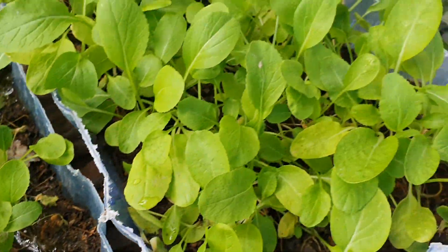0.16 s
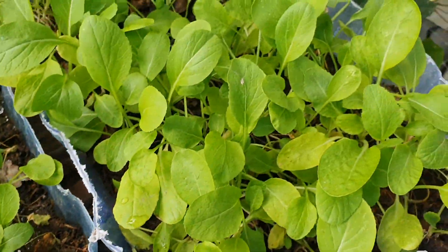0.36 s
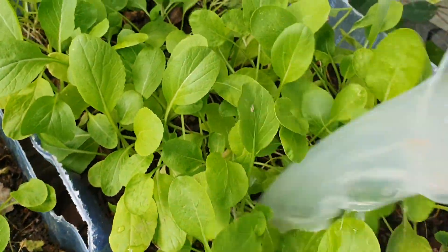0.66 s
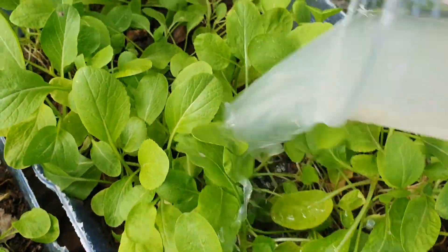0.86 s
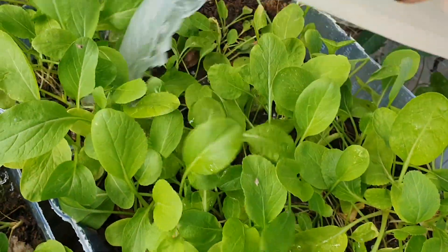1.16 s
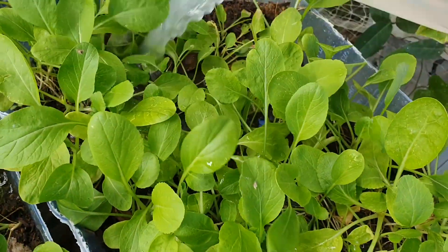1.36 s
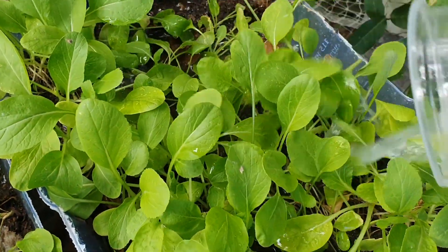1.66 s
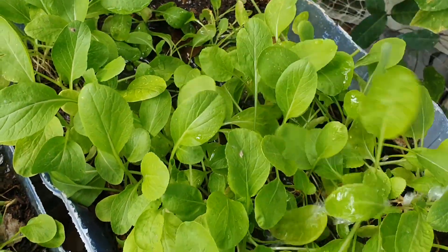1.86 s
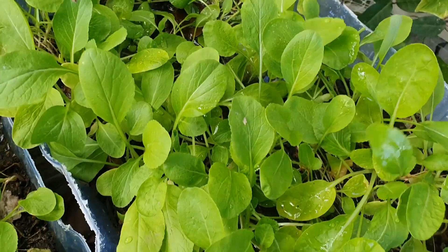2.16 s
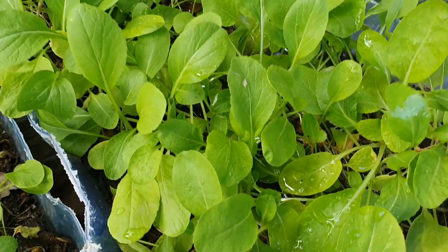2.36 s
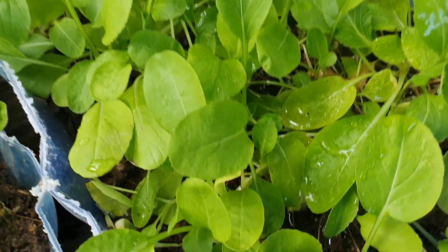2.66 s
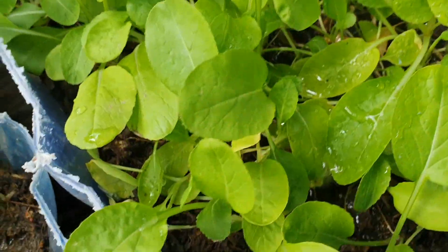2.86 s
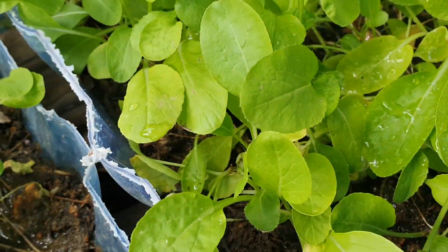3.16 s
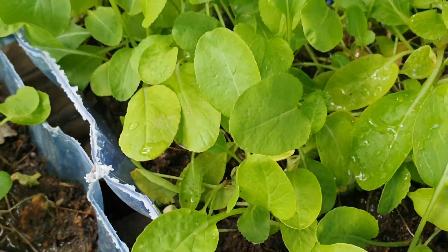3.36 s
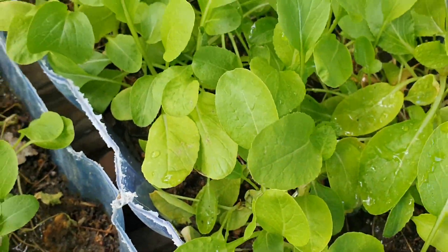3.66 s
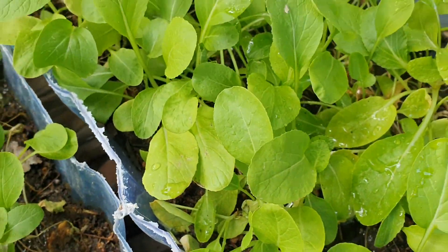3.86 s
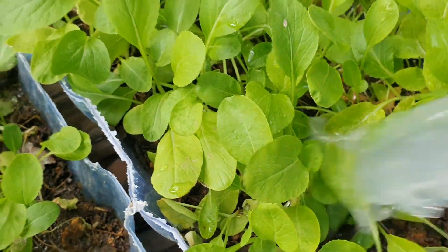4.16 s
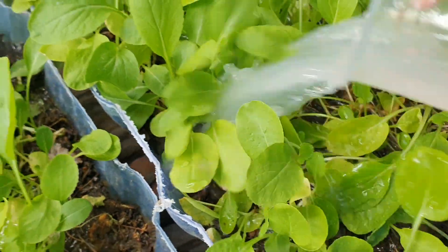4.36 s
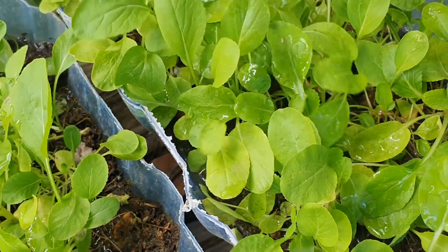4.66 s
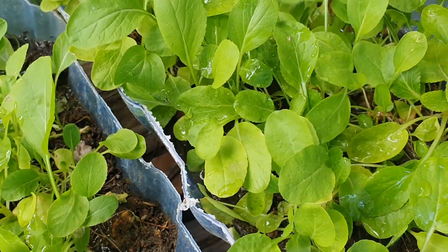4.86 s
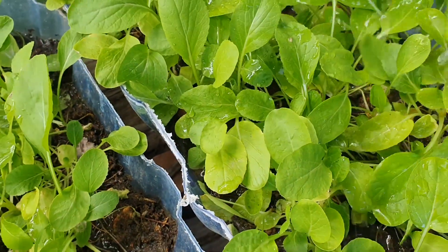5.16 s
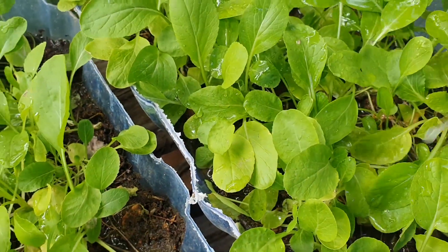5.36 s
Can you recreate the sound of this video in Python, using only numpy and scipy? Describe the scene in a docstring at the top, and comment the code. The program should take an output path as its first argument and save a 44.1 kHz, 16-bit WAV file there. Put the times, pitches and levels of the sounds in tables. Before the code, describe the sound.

A low street rumble with droning engines opens the scene. Water showers leaves and soil twice, crisp and bubbly, drops tapping leaves. A plastic cup clatters and scrapes while scooping water, then pours again. At the end come sharp hollow knocks, a weak sprinkle and a car drawing near. The water is close in stereo, the traffic wide and distant, with a short dull outdoor reflection.

```python
"""Engines drone in a street some way off until about 4.4 s (orders of a firing rate), over rumble, tyre noise
and hiss. A cupful of water is flung in two sheets onto leafy seedlings: showers of tiny bubble rings, patter
and fine spray. Then the plastic cup knocks (damped modes, noise cracks), scrapes and sloshes in a bucket as it
scoops again. Two more pours follow, the last faint, with hard knocks and a car drawing near; stray drops tick
and plink all along. Two spaced microphone ports hear it."""
import sys
import numpy as np
from scipy import signal
from scipy.fft import rfft, irfft, next_fast_len
from scipy.io import wavfile
from scipy.ndimage import uniform_filter1d, map_coordinates

SR = 44100
rng = np.random.default_rng(int(sys.argv[2]) if len(sys.argv) > 2 else 0)


def wrap_up_sound(samples):
    """Save the sound to the file named by the first command line argument, as 16-bit audio."""
    columns = np.atleast_2d(samples).T
    # keep every value between -1 and 1, then stretch to whole-number steps
    tamed = np.clip(columns, -1, 1)
    steps = np.round(tamed * 32767).astype(np.int16)
    wavfile.write(sys.argv[1], SR, steps)


N = 243333
TIME = np.arange(N) / SR
PORT_LAG_S = 0.000555  # travel time between the ports
TOP_HZ = 15950


def amp(db):
    """Decibels to gain."""
    return 10 ** (np.asarray(db) / 20)


def unit(x):
    """x at rms 1."""
    return x / np.sqrt(np.mean(x ** 2) + 1e-20)


def curves(rows):
    """One value per sample for each column after the time."""
    s, *cols = np.transpose(rows)
    return [np.interp(TIME, s, c) for c in cols]


def during(rows, fade_s):
    """1 while a table lasts, fading out on both sides."""
    first_s, last_s = rows[0][0], rows[-1][0]
    return np.interp(TIME, [first_s - fade_s, first_s, last_s, last_s + fade_s], [0, 1, 1, 0])


def wobble(rate_hz):
    """A smooth random curve, rate_hz knots a second."""
    knots = rng.standard_normal(int(N * rate_hz / SR) + 4)
    return map_coordinates(knots, [TIME * rate_hz])


def swell(s, hold_s, attack_s, release_s, sag_db_per_s=0):
    """Gain that rises to time s, holds while sagging and dies; attack and release span 60 dB."""
    early_s, late_s = np.maximum(s - TIME, 0), np.maximum(TIME - s - hold_s, 0)
    fade_db = -60 * (early_s / attack_s + late_s / release_s)
    return amp(fade_db - sag_db_per_s * np.clip(TIME - s, 0, hold_s))


def filtered(x, response):
    """x times a complex response of frequency."""
    m = next_fast_len(N + 8192)
    spectrum = rfft(x, m) * response(np.fft.rfftfreq(m, 1 / SR))
    return irfft(spectrum, m)[..., :N]


def coloured(x, points):
    """x shaped by (freq_hz, gain_db) points, at rms 1."""
    f, db = np.transpose(points)
    return unit(filtered(x, lambda hz: amp(np.interp(np.log(hz + 1), np.log(f), db, right=-120))))


def band(x, lo_hz, hi_hz, order=2):
    """Causal band-pass."""
    sos = signal.butter(order, [lo_hz, min(hi_hz, SR / 2 - 1)], "band", fs=SR, output="sos")
    return signal.sosfilt(sos, x)


def add(track, s, sound):
    """Mix a sound in at time s."""
    part = track[..., max(round(s * SR), 0):][..., :sound.shape[-1]]
    part += sound[..., :part.shape[-1]]


def burst(x, db, seconds):
    """x scaled so that its energy equals db held for that many seconds."""
    return amp(db) * x * np.sqrt(seconds * SR / (np.sum(x ** 2, -1, keepdims=True) + 1e-20))


def heard_from(x, lag_s, pan_db):
    """A point source: it reaches the left port lag_s after the right."""
    sides = np.array([[1], [-1]]) / 2
    return amp(sides * pan_db) * filtered(x, lambda hz: np.exp(-2j * np.pi * hz * lag_s * sides))


def diffuse(pair):
    """Sound from all around: alike at both ports in the bass, unrelated in the treble."""
    def mix(hz):
        turn = np.arccos(.88 * np.sinc(2 * hz * PORT_LAG_S)) / 2
        return np.array([np.cos(turn), np.sin(turn)])
    mid, side = filtered(pair, mix)
    return np.array([mid + side, mid - side])


def rush(spectrum):
    """Diffuse noise of rms 1."""
    return coloured(diffuse(rng.standard_normal((2, N))), spectrum)


def bubble(t, hz, cycles):
    """A trapped bubble rings for some cycles after a soft start."""
    age = np.maximum(t, 0) * hz
    return np.sin(2 * np.pi * age) * np.exp(-age / cycles) * (1 - np.exp(-age))


def grains(rate, hz, spread, cycles, size_db, scatter, size=400):
    """A stereo shower of tiny rings, rate a second, each from its own direction; near rms 1."""
    count = int(np.clip(rate * N / SR, 1, 30000))
    when, strength, where = rng.random((count, 3)).T
    pitch_hz = np.clip(hz * np.exp(spread * rng.standard_normal((count, 1))), 100, TOP_HZ)
    gain = amp(size_db * np.minimum(-np.log(1 - strength), 3))[:, None]
    index = (when * N).astype(int)[:, None] + np.arange(size)
    lag_s = scatter * PORT_LAG_S * (2 * where[:, None] - 1)
    shower = []
    for side in (1, -1):
        t = np.arange(size) / SR - np.maximum(side * lag_s, 0)
        port = gain * bubble(t, pitch_hz, cycles)
        shower.append(np.bincount(index.ravel(), port.ravel(), N)[:N])
    shower = np.array(shower)
    # the flow is even over a tenth of a second, however the single drops fall
    power = uniform_filter1d(np.mean(shower ** 2, 0), SR // 10)
    return shower / np.sqrt(np.abs(power) + 1e-9)


def engine(rows, orders, unsteady_db):
    """An exhaust note: orders of the firing rate, each wavering a little."""
    hz, db = curves(rows)
    phase = 2 * np.pi * (np.cumsum(hz) / SR + rng.random())
    note = sum(amp(level + unsteady_db * wobble(5.24)) * np.sin(k * phase) for k, level in orders)
    return np.sqrt(2) * amp(db) * during(rows, 0.042) * note


# orders of the idling engine: multiple, relative_db
IDLE_ORDERS = [(2, 1), (4, -17), (5, -17.5), (6, -19.5), (8, -21)]
IDLE_HZ, IDLE_DB, IDLE_QUIET_DB = 40.13, -36.5, -40.5  # firing rate, level in the open, level when screened
IDLE_OPEN_S, IDLE_END_S = 1, 2.8  # fully heard, falls away


def idling_engine():
    """A steady firing rate and its multiples, growing as it comes into the open."""
    rows = [(0, IDLE_HZ, IDLE_QUIET_DB), (IDLE_OPEN_S, IDLE_HZ, IDLE_DB), (IDLE_END_S, IDLE_HZ, IDLE_DB)]
    return heard_from(engine(rows, IDLE_ORDERS, unsteady_db=2.86), lag_s=-0.0002, pan_db=-0.5)


SWELL_DB = 9  # loudest point over the ends


def winding_down(start_s, loudest_s, end_s, first_hz, last_hz, db):
    """Engine rows: speed lost by a steady ratio up to and after the loudest point."""
    s = np.array([start_s, loudest_s, end_s])
    hz = first_hz * (last_hz / first_hz) ** ((s - start_s) / (end_s - start_s))
    return np.transpose([s, hz, [db - SWELL_DB, db, db - SWELL_DB]])


# orders of a passing exhaust: multiple, relative_db
PASSING_ORDERS = [(0.99, -0.82), (3 / 2, -17), (2, -25)]
# note of a cruising vehicle: time_s, base_hz, base_db
CRUISING_NOTE = [(0.0, 140.4, -43), (0.284, 148.3, -36.5), (0.316, 147.7, -42), (0.5, 137, -37.5),
                 (0.946, 148.6, -40.5), (1.0, 135.9, -52)]
# engines that wind down: start_s, loudest_s, end_s, first_hz, last_hz, base_db
SLOWING_ENGINES = [(0.85, 1.85, 2.65, 51, 38.5, -30.5), (2.8, 2.9, 3.35, 122, 89, -31.5),
                   (3.4, 3.52, 3.87, 124, 89, -32), (3.55, 3.9, 4.4, 82, 51, -35)]


def passing_engines():
    """Exhaust notes of vehicles cruising and slowing, from one direction."""
    vehicles = [CRUISING_NOTE] + [winding_down(*row) for row in SLOWING_ENGINES]
    notes = sum(engine(rows, PASSING_ORDERS, unsteady_db=2.0) for rows in vehicles)
    return heard_from(notes, lag_s=0.00045, pan_db=0.0)


# swells of the rumble: start_s, length_s, base_db
RUMBLE_SURGES = [(0.0, 1.6, -36.5), (1.7, .3, -33), (2.1, 1.58, -37), (3.76, .14, -36), (3.98, .04, -36),
                 (4.15, .13, -34.5), (4.49, .07, -34), (5.11, .11, -35), (5.32, .2, -29.5)]
# rumble colour: freq_hz, relative_db
RUMBLE_SPECTRUM = [(20, -44), (31, -30), (45, -2.5), (62, -1.5), (110, -4.5), (160, -15), (300, -21.5),
                   (500, -28.5), (900, -73)]
SURGE_ATTACK_S, SURGE_RELEASE_S, CALM_DB = .15, .2, -43  # 60 dB times; level between swells


def street_rumble():
    """Diffuse low noise that surges and flickers."""
    swells = [amp(db) * swell(s, length_s, SURGE_ATTACK_S, SURGE_RELEASE_S)
              for s, length_s, db in RUMBLE_SURGES]
    level = np.hypot(np.max(swells, axis=0), amp(CALM_DB))
    return level * amp(2.5 * wobble(14)) * rush(RUMBLE_SPECTRUM)


# far tyre colour: freq_hz, relative_db
ROAR_SPECTRUM = [(150, -39), (250, -0.5), (400, -2.5), (700, 0), (1200, -4.5), (2000, -12.5), (3500, -19),
                 (6000, -36)]


def tyre_roar():
    """Far tyres: mid-range diffuse noise, fluttering a few times a second."""
    return amp(-51.5 + 2.7 * wobble(7)) * rush(ROAR_SPECTRUM)


# near tyre colour: freq_hz, relative_db
CAR_SPECTRUM = [(240, -8), (400, -0.5), (507, -10.5), (659, 1), (808, -3.5), (936, -1), (6000, -26.5),
                (7800, -58), (13200, -120)]
NEAREST_S, CAR_DB, CAR_DB_PER_S = 5.32, -43, 7.5


def nearing_car():
    """Tyre noise that grows as a car draws near, then falls."""
    return amp(CAR_DB - CAR_DB_PER_S * abs(TIME - NEAREST_S)) * rush(CAR_SPECTRUM)


# hiss colour: freq_hz, relative_db
HISS_SPECTRUM = [(500, -33), (1300, -2.5), (2200, 0), (4000, -4.5), (6000, -9.5), (7350, -14), (9300, -10),
                 (11000, -14.5), (13000, -18.5), (16000, -30)]


def street():
    """Distant traffic: exhaust notes over rumble, tyre noise and a thin steady hiss."""
    engines = idling_engine() + passing_engines()
    hiss = amp(-51.5) * rush(HISS_SPECTRUM)
    return engines + street_rumble() + tyre_roar() + nearing_car() + hiss


def yard(x, t60_s=0.11):
    """Nearby pots and walls give a short, dull answer: x convolved with decaying noise."""
    t = np.arange(SR // 4) / SR
    noise = band(rng.standard_normal((2, len(t))), 170, 7300, order=1)
    tail = noise * amp(-60 * t / t60_s) * (t > .004)
    return diffuse(signal.fftconvolve(x, tail / np.linalg.norm(tail[0]), axes=1)[:, :N])


# leaf slaps: start_s, level_at_middle_db, brightness_db_per_octave
TICKS = [(0.09, -47.5, -4.5), (0.145, -54, 2), (0.249, -49, -7.5), (0.619, -41, 5), (0.6732, -58, 1),
         (0.6976, -57, -1), (0.7752, -43.5, -4), (1.2568, -39, 2.5), (1.373, -42, -0.5),
         (1.544, -40.5, 0.5), (1.6152, -37.5, 5.5), (1.7543, -46.5, -0.5), (2.026, -49.5, -2.5),
         (2.6016, -44.5, -4.5), (2.955, -45, -8), (3.0034, -40, -3.5), (3.0934, -47.5, 0), (3.124, -54, -4),
         (4.1692, -41.5, 0), (4.371, -42, -6), (4.508, -41, 0.5), (4.5978, -42, 0.5), (4.705, -43.5, 0),
         (4.8204, -44, -2), (4.868, -55, 0)]
# bands of a slap: low_hz, high_hz
TICK_BANDS = [(1200, 3000), (3000, 6500), (6500, 15000)]


def leaf_ticks(t60_s=0.019, middle_hz=4400):
    """A fat drop slaps a leaf: a dry, decaying noise burst."""
    out, t = np.zeros((2, N)), np.arange(SR // 12) / SR
    for s, tick_db, brightness_db in TICKS:
        slap = rng.standard_normal((2, len(t))) * amp(-60 * t / t60_s)
        for lo, hi in TICK_BANDS:
            db = tick_db + brightness_db * np.log2(np.sqrt(lo * hi) / middle_hz)
            add(out, s, burst(band(slap, lo, hi, order=3), db, seconds=0.0065))
    return band(out, 500, 12600, order=2)


# drops that trap a bubble: start_s, base_db, pitch_hz
PLINKS = [(0.677, -26, 4040), (0.7375, -30, 5970), (0.833, -29.5, 4030), (0.926, -34.5, 2070),
          (0.935, -34, 2750), (1.0338, -29, 3840), (1.0829, -26, 5170), (1.1, -27.5, 3710),
          (1.373, -31, 4900), (1.6487, -31.5, 4460), (2.387, -28.5, 9350), (2.9567, -29, 2360),
          (3.324, -32.5, 986), (4.2725, -37, 4270), (4.7156, -24, 9600), (4.8198, -29, 4960),
          (4.8377, -27, 4980), (4.8673, -29, 3400), (5.044, -31, 8700)]


def plinks(cycles=14):
    """A drop in standing water traps a bubble that rings."""
    out, t = np.zeros(N), np.arange(SR // 12) / SR
    for s, db, hz in PLINKS:
        add(out, s, amp(db - 0.5) * bubble(t, hz, cycles))
    return heard_from(out, lag_s=.00003, pan_db=1.5)


# pushes of the cup: start_s, length_s, scrape_base_db, slosh_base_db
SCOOP_PUSHES = [(-0.007, 0.067, -41.5, -50), (2.824, 0.064, -28, -45.5), (2.869, 0.012, -39, -35.5),
                (3.002, 0.031, -39.5, -42), (3.066, 0.0087, -32, -60), (3.123, 0.033, -43, -44),
                (3.218, 0.013, -47, -49.5), (3.318, 0.042, -45.5, -51.5)]
# scrape filter: freq_hz, gain_db
SCRAPE_FILTER = [(140, 1), (250, -11.5), (350, -9.5), (500, -3), (750, -8.5), (1000, -5), (1500, -2.5),
                 (2300, -16), (3500, -42)]
# slosh filter: freq_hz, gain_db
SLOSH_FILTER = [(940, -11), (1600, -26), (1920, -11.5), (3200, -12), (3560, -13.5), (5650, -15.5),
                (6220, -22), (9880, -9.5), (16000, -12)]
PUSH_ATTACK_S, PUSH_RELEASE_S, SETTLE_S = 0.19, 0.078, 0.16  # 60 dB times: push builds, stops, water settles


def scoop():
    """The rim stutters along the bucket while water slops into the cup."""
    push, slop = np.zeros(N), np.zeros(N)
    for s, length_s, scrape_db, slosh_db in SCOOP_PUSHES:
        push += amp(scrape_db) * swell(s, length_s, PUSH_ATTACK_S, PUSH_RELEASE_S)
        slop += amp(slosh_db) * swell(s, length_s, PUSH_ATTACK_S, SETTLE_S)
    stutter = grains(rate=1500, hz=750, spread=0.7, cycles=1.35, size_db=2, scatter=1.0)
    scrape = coloured(stutter, SCRAPE_FILTER)
    fizz = grains(rate=6000, hz=4800, spread=0.645, cycles=6, size_db=1.5, scatter=.9, size=150)
    glugs = grains(rate=350, hz=2700, spread=.42, cycles=16, size_db=5, scatter=0.61, size=700)
    slosh = coloured(fizz, SLOSH_FILTER) + amp(-2.5) * glugs
    return amp(-1.0) * push * scrape + slop * slosh


# blows: start_s, base_db, strongest_hz, fall_below_db_per_octave, fall_above_db_per_octave
KNOCKS = [(0.3638, -29, 1140, 25, 5), (1.696, -18, 1280, 2, 12.5), (2.556, -29, 417, -6, 7.5),
          (2.586, -35.5, 420, 5, 3), (2.684, -26.5, 414, -16, 6), (2.721, -34, 700, 2, 3.5),
          (2.78, -23.5, 700, 4.5, 11.5), (2.865, -27.5, 420, -4, 6), (2.881, -29.5, 9000, 18, 3),
          (2.9024, -24, 1470, 5, 5.5), (2.914, -22.5, 420, 3, 8.5), (3.55, -32, 420, 3, 7),
          (3.6342, -20.5, 5160, 5.5, 8.5), (5.181, -35.5, 1300, 5, 11), (5.2363, -13.5, 2340, 5.5, 10),
          (5.267, -20, 800, 11.5, 12)]
# registers, thump to snap: low_hz, high_hz
KNOCK_BANDS = [(250, 620), (620, 920), (920, 1220), (1220, 1800), (1800, 3000), (3000, 6500), (6500, 15000)]
# how readily the cup answers in each register: gain_db
KNOCK_ANSWER_DB = [0, -0.5, -4.5, -1, -4, -4, -3]
# modes of the plastic: freq_hz, relative_db, t60_s
PLASTIC_MODES = [(397.6, -2, 0.064), (498, 0.5, 0.043), (520, 1.5, 0.015), (773, 0, 0.045),
                 (1190, 0, 0.011), (1330, 3, 0.022), (1568, -4, 0.018), (1941, -19, 0.0069),
                 (1920, -10, 0.0091), (2240, 13, 0.012), (3550, -2, 0.0018), (4130, 13, 0.02),
                 (4840, 11, 0.017), (6200, -19, 0.035), (9570, 0, 0.0043)]
# where the cup is held: time_s, left_after_right_s
CUP_BEARING = [(0.36, .00027), (1.7, .00016), (2.55, .00034), (2.9, .00032), (3.6, .00039), (5.2, .00026)]


def knocks(contact_s=0.00083, crack_t60_s=0.021, crack_db=-4.5, ring_db=-1, hardening_db=2.5,
           attack_s=0.00015, right_db=2.2):
    """Each blow rings the plastic; where and how hard it lands sets the level of each register."""
    out, t = np.zeros((2, N)), np.arange(SR // 8) / SR
    hz, mode_db, t60_s = np.transpose(PLASTIC_MODES)[:, :, None]
    onset = 1 - np.exp(-t / attack_s)
    # the wall buckles through the contact, then lets go
    buckle = onset * amp(-60 * np.maximum(t - contact_s, 0) / crack_t60_s)
    for s, blow_db, strongest_hz, below_db, above_db in KNOCKS:
        lag_s = np.interp(s, *np.transpose(CUP_BEARING))
        grip = 1 + 0.012 * rng.standard_normal(hz.shape)  # the hand detunes the wall a little
        phase = 2 * np.pi * (hz * grip * t + rng.random(hz.shape))
        modes = onset * amp(mode_db - 60 * t / t60_s) * np.sin(phase)
        for answer_db, (lo, hi) in zip(KNOCK_ANSWER_DB, KNOCK_BANDS):
            octaves = np.log2(np.sqrt(lo * hi) / strongest_hz)
            fall_db = abs(octaves) * (above_db if octaves > 0 else below_db)
            db = blow_db + answer_db - fall_db
            ring = np.sum(modes * ((lo <= hz) & (hz < hi)), 0)
            crack = band(buckle * rng.standard_normal(len(t)), lo, hi, order=3)
            crowding_db = hardening_db * np.log2(lo / 900)  # higher up, modes crowd into noise
            blow = burst(ring, db + ring_db - crowding_db / 2, seconds=0.011)
            blow = blow + burst(crack, db + crack_db + crowding_db, seconds=0.012)
            add(out[0], s + lag_s / 2, amp(-right_db / 2) * blow)
            add(out[1], s - lag_s / 2, amp(right_db / 2) * blow)
    return band(out, 76, 10400, order=2)


# sheets of water landing: start_s, length_s, bubbling_base_db, spray_base_db, spray_t60_s
POURS = [(0.639, 0.624, -46, -45, .35), (1.364, 0.36, -49, -50.5, 0.3), (4.182, 0.64, -45, -48, 3),
         (5.164, 0.35, -62, -62, .4)]
# thick gushes on the soil: start_s, length_s, bubbling_base_db
GUSHES = [(0.68, 0.07, -38), (0.92, .04, -49), (1.02, 0.069, -46), (4.255, .025, -45),
          (4.815, 0.084, -44.5)]
# leaf patter filter: freq_hz, gain_db
PATTER_FILTER = [(500, -25), (1100, -13), (2100, -1), (3100, -2.5), (4500, 9.5), (6000, -19), (8000, -20)]
# fine spray filter: freq_hz, gain_db
SPRAY_FILTER = [(2900, 9), (5000, -7.5), (7400, -17), (9300, -9.5), (11400, -13), (15000, -6.5),
                (16000, -16)]
SPRAY_LEAD_S, SOAK_S, DRAIN_S = 0.73, 0.16, 0.21  # 60 dB times: spray arrives early, bubbling builds, drains
GUSH_ATTACK_S, GUSH_RELEASE_S = 0.071, 0.097  # 60 dB times
BUBBLING_SAG_DB_PER_S, SPRAY_SAG_DB_PER_S = 5, 4  # the flow thins as the cup empties


def pours():
    """Each cupful breaks into drops: bubbles in the soil, patter and fine spray off the leaves."""
    bubbles = grains(rate=1200, hz=3950, spread=0.32, cycles=14, size_db=6.5, scatter=0.74, size=650)
    # pooled water rings longer
    pooled = grains(rate=100, hz=3370, spread=0.33, cycles=26, size_db=4, scatter=0.5, size=1500)
    taps = grains(rate=3900, hz=2665, spread=0.505, cycles=3.5, size_db=5.0, scatter=0.78, size=230)
    patter = coloured(taps, PATTER_FILTER)
    beads = grains(rate=350, hz=8990, spread=0.155, cycles=22, size_db=7.5, scatter=0.663, size=400)
    specks = grains(rate=4500, hz=9030, spread=0.28, cycles=2.6, size_db=2.0, scatter=0.69, size=80)
    mist = coloured(specks, SPRAY_FILTER)
    flow, spray, gush = np.zeros(N), np.zeros(N), np.zeros(N)
    for s, length_s, bubbling_db, spray_db, t60_s in POURS:
        flow += amp(bubbling_db) * swell(s, length_s, SOAK_S, DRAIN_S, BUBBLING_SAG_DB_PER_S)
        spray += amp(spray_db) * swell(s, length_s, SPRAY_LEAD_S, t60_s, SPRAY_SAG_DB_PER_S)
    for s, length_s, db in GUSHES:
        gush += amp(db) * swell(s, length_s, GUSH_ATTACK_S, GUSH_RELEASE_S)
    clumps = amp(2.4 * wobble(60))  # the sheet of water lands in lumps
    wet = np.hypot(flow, gush) * (amp(-1.5) * bubbles + amp(-7) * pooled + amp(-4.5) * patter)
    return clumps * (wet + spray * (amp(-13) * beads + mist))


def scene():
    """Water and cup close by, the street behind."""
    struck = knocks() + leaf_ticks() + plinks()
    return street() + amp(-19) * yard(struck) + scoop() + struck + pours()


def record(dry):
    """Clips at full scale, then keeps nothing from TOP_HZ up."""
    return filtered(np.clip(dry, -1, 1), lambda hz: hz < TOP_HZ)


dry = scene()
out = record(dry)
wrap_up_sound(out)
```